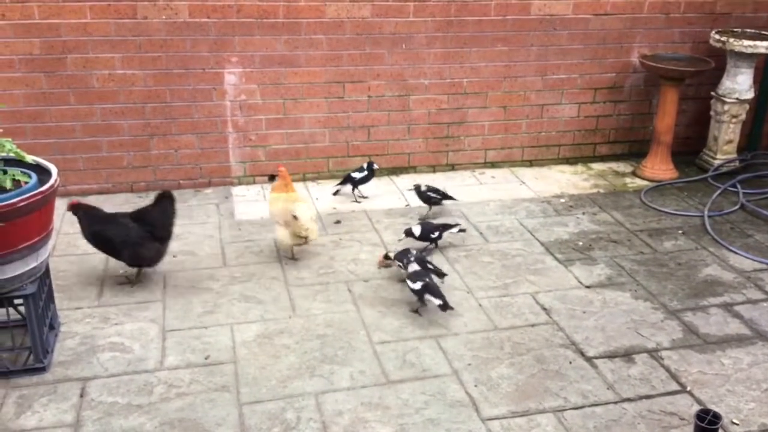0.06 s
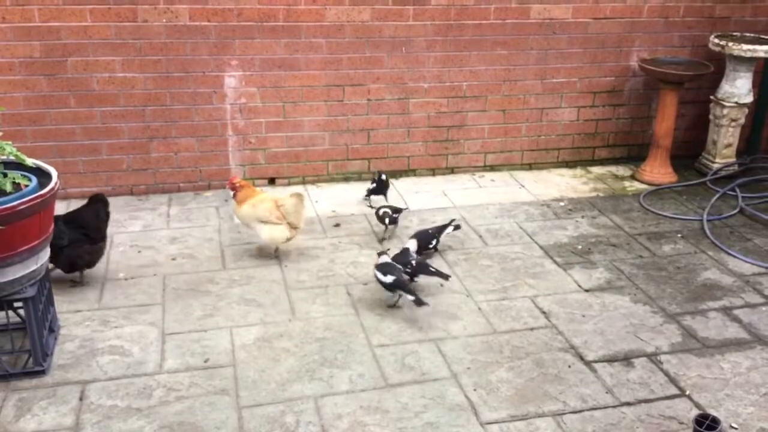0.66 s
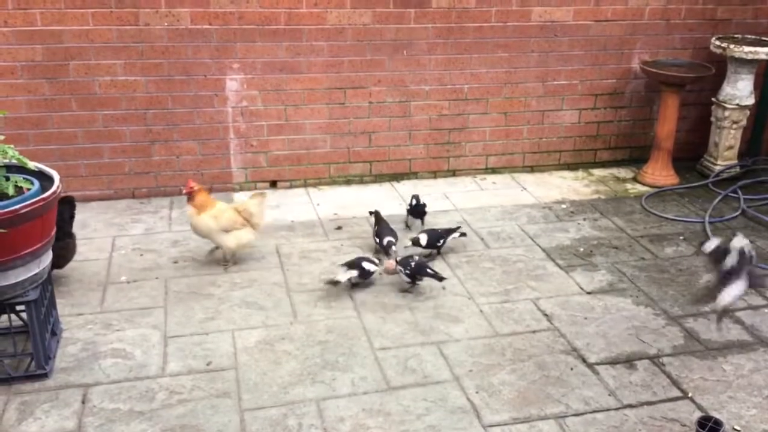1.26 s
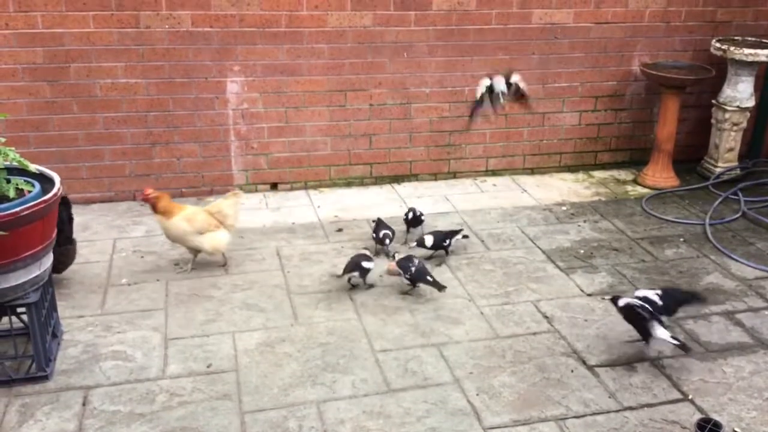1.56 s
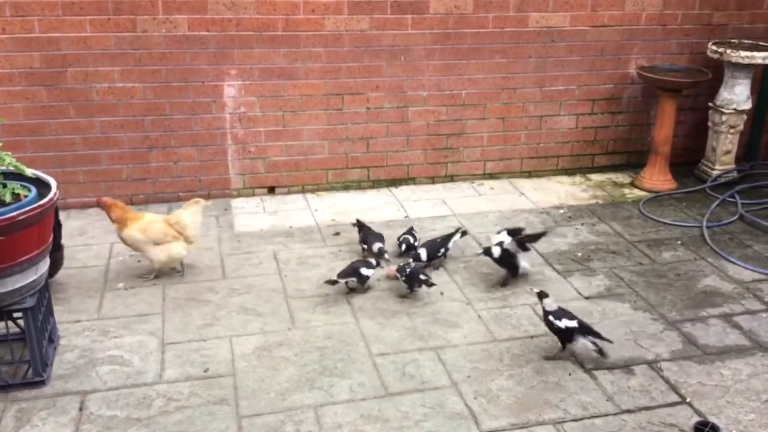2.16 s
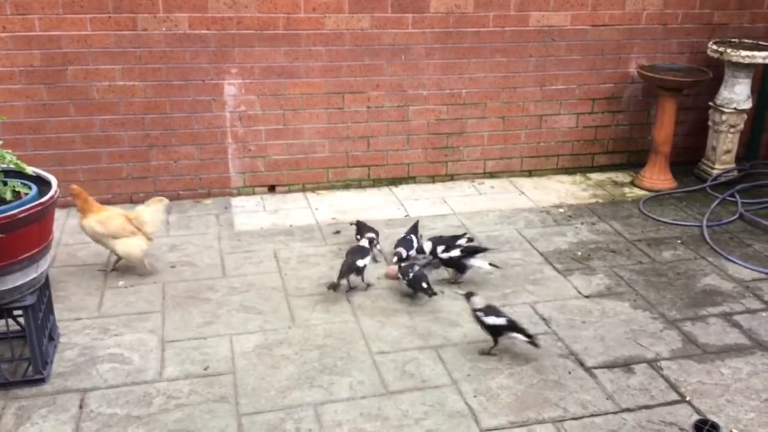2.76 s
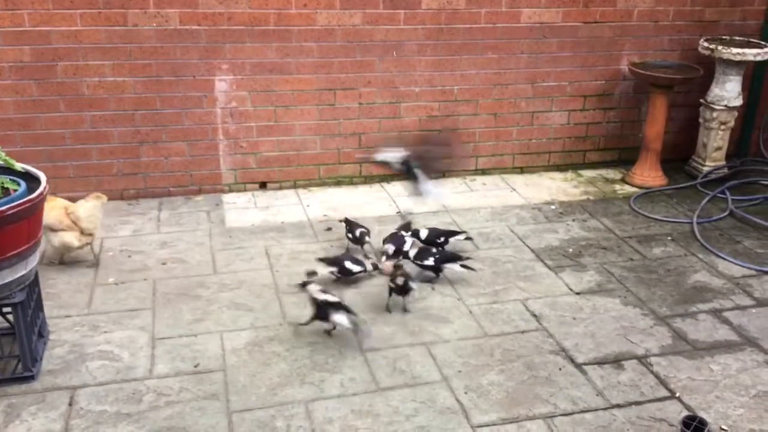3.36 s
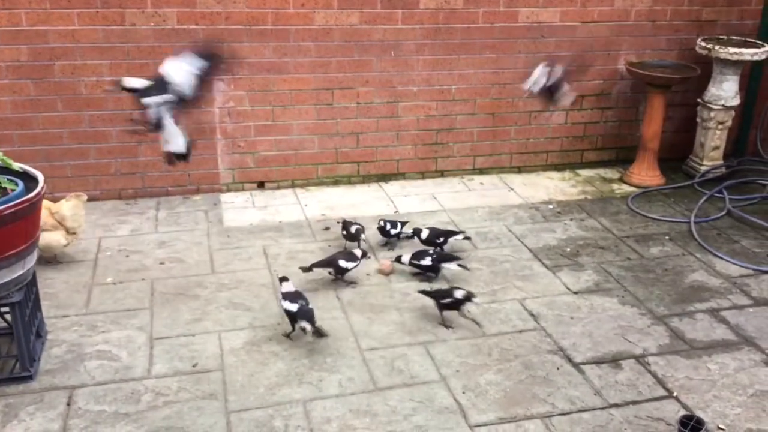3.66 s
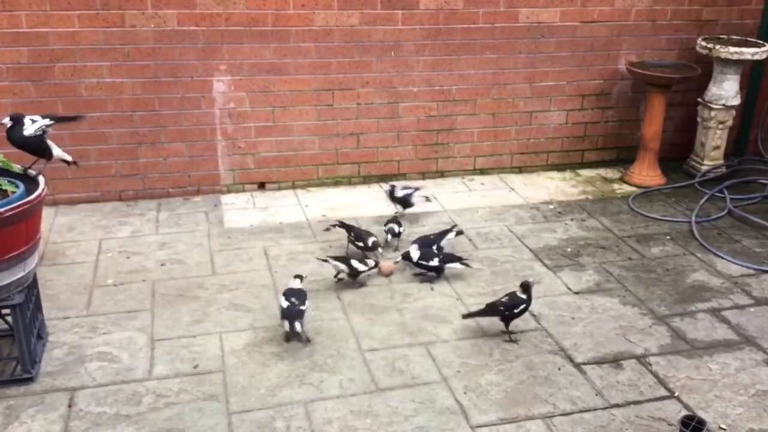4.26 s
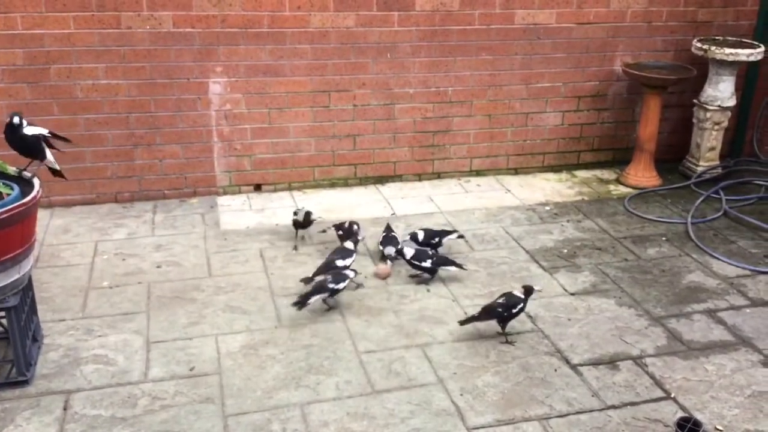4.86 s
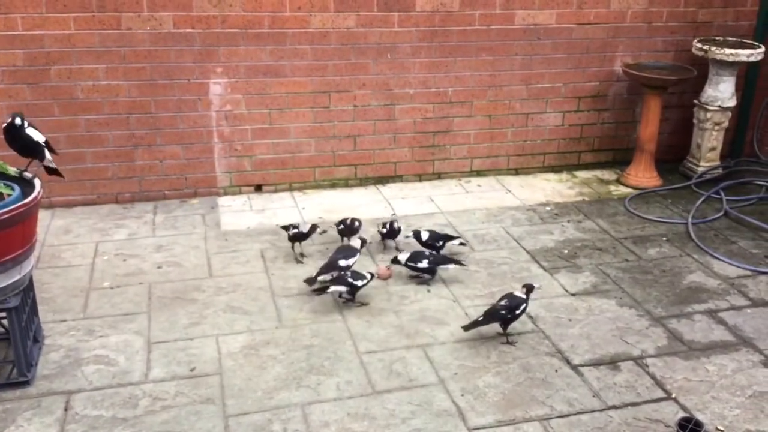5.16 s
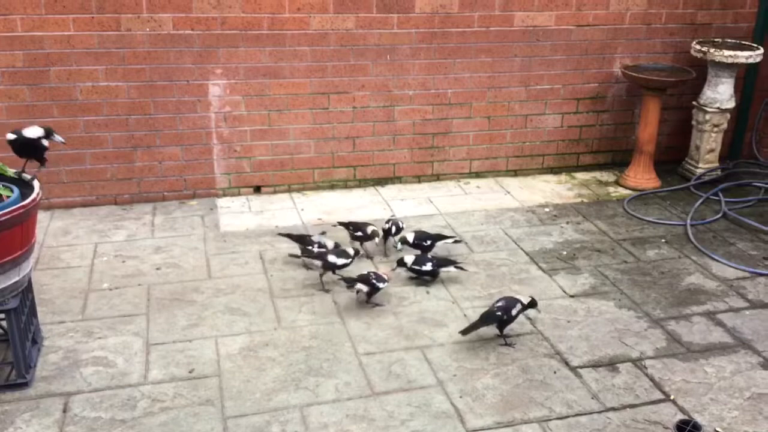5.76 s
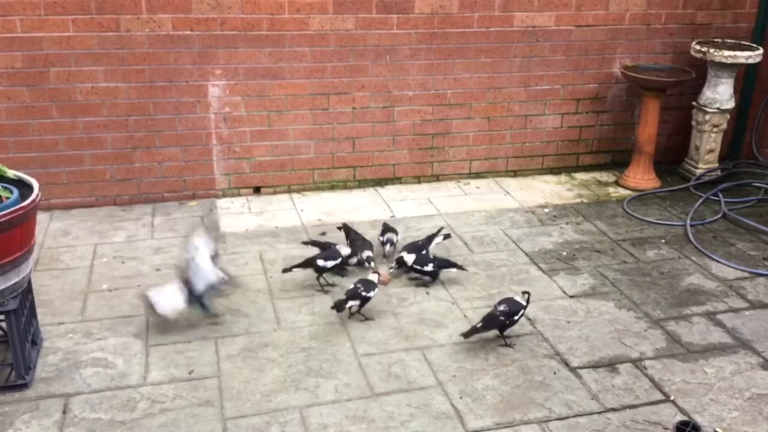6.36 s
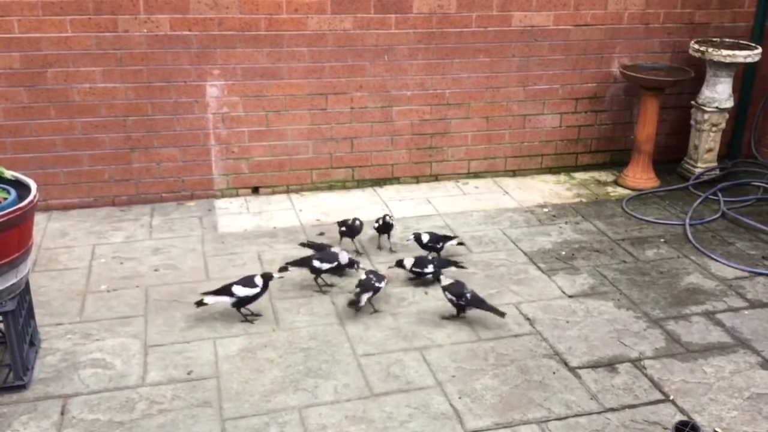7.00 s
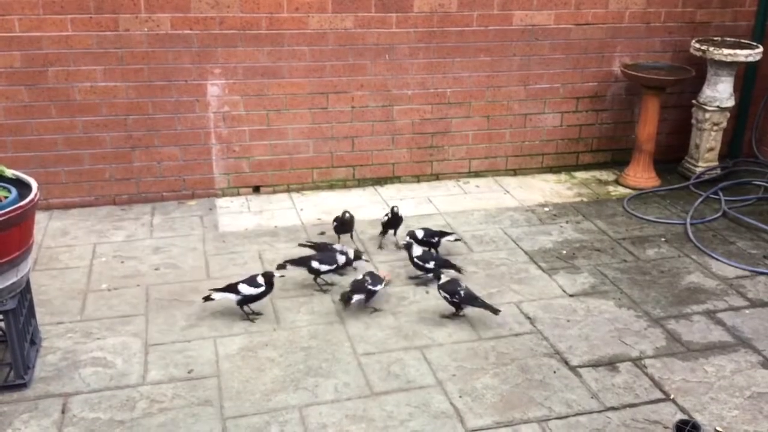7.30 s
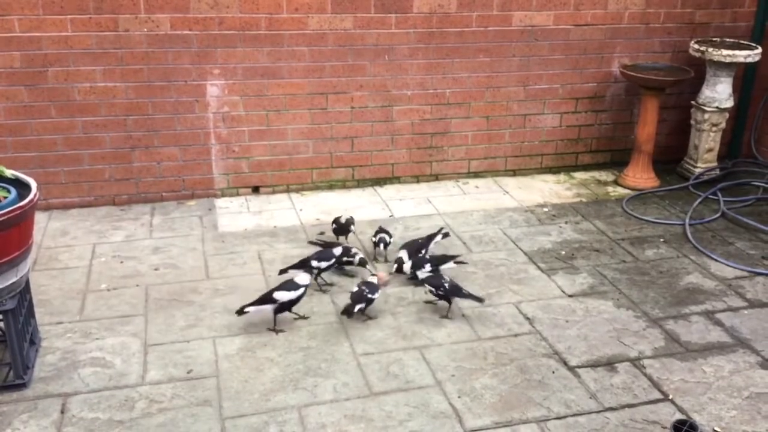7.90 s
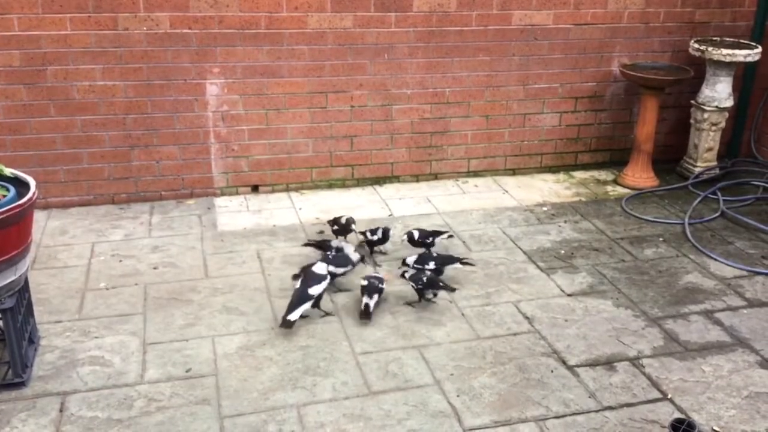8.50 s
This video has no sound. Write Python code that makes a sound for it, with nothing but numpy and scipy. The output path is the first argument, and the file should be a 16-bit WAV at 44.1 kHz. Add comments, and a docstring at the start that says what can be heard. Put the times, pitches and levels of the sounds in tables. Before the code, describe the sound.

Over a soft, steady outdoor rumble, a flock of magpies gives quick, raspy, arching squawks a short way from the microphone. One bird lets out a clear sliding squeal, and the squawking reaches its densest before easing into scattered calls. Feet and feathers shuffle faintly, beaks tick on paving, distant birds whistle, and wings swish once near the end. The walled yard gives everything a short echo.

```python
"""Magpies squawk over a low outdoor rumble, squabbling for food in a paved, brick-walled courtyard.
Each squawk is an arch of pitch, nasal or rasping: a membrane pulses, and throat and beak resonate.
Far birds whistle, feet and feathers shuffle, beaks and claws tick on the stone, one bird squeals,
and late on, wings flap once nearby. The walls return the calls, ticks and flap as a brief echo."""
import sys
import numpy as np
from scipy import signal
from scipy.fft import rfft, irfft, next_fast_len
from scipy.io import wavfile
from scipy.ndimage import uniform_filter1d

SR = 44100
rng = np.random.default_rng(int(sys.argv[2]) if len(sys.argv) > 2 else 0)


def materialize(psi):
    """Save the field psi as 16-bit PCM at rate SR to the path in sys.argv[1].

    A 1-D psi becomes a single channel; in a 2-D psi each row is a channel.
    """
    bounded = np.clip(np.atleast_2d(psi).T, -1, 1)
    quanta = np.round(bounded * 32767).astype(np.int16)
    wavfile.write(sys.argv[1], SR, quanta)


N = 376613
TIME = np.arange(N) / SR
CUTOFF_HZ = 15800


def from_db(db):
    """Decibels to amplitude ratio."""
    return 10 ** (np.asarray(db) / 20)


def unit_rms(x):
    """Normalisation to unit power."""
    return x / np.sqrt(np.mean(x ** 2) + 1e-20)


def in_time(rows, t):
    """Linear interpolation of each column at times t."""
    seconds, *columns = np.transpose(rows)
    return [np.interp(t, seconds, column) for column in columns]


def at_hz(points, hz):
    """Interpolation on a log-frequency axis."""
    frequencies, values = np.transpose(points)
    return np.interp(np.log(hz + 1e-9), np.log(frequencies), values)


def coloured(x, spectrum):
    """Zero-phase filtering by a spectral envelope, at unit rms."""
    size = next_fast_len(len(x))
    gain = from_db(at_hz(spectrum, np.fft.rfftfreq(size, 1 / SR)))
    return unit_rms(irfft(rfft(x, size) * gain, size)[:len(x)])


def tuned(shape, hz):
    """Frequency scaling of a resonance shape."""
    return [(multiple * hz, db) for multiple, db in shape]


def band(x, hz, kind, order=4):
    """Butterworth filtering."""
    return signal.sosfilt(signal.butter(order, hz, kind, fs=SR, output="sos"), x)


def wander(count, rate):
    """Random modulation of unit rms, with `rate` new values a second."""
    steps = np.arange(count) * rate / SR + rng.random()
    knots = int(steps[-1]) + 2
    return unit_rms(np.interp(steps, np.arange(knots), rng.standard_normal(N // 4)[:knots]))


def window(start, end, fade_s):
    """The times of a sound and its raised-cosine gate."""
    t = TIME[(TIME > start - fade_s / 2) & (TIME < end + fade_s / 2)]
    ramp = np.clip(np.minimum(t - start, end - t) / fade_s + .5, 0, 1)
    return t, np.sin(np.pi / 2 * ramp) ** 2


def add(out, t, sound):
    """Superposition of a sound at its times."""
    first = round(t[0] * SR)
    out[first:first + len(sound)] += sound


def arch(count, first, middle, last):
    """A parabolic glide through three pitches."""
    return np.polyval(np.polyfit([0, .5, 1], [first, middle, last], 2), np.linspace(0, 1, count))


def syrinx(pitch, rough, rasp_hz=135, swing=0.15, jitter=0.054, throb=0.16, waver=0.01245):
    """Modulation: flutter swings the membrane's phase and strength, and chaos scatters its cycles."""
    count = len(pitch)
    flutter = np.sin(2 * np.pi * np.cumsum(rasp_hz * (1 + .13 * wander(count, 70))) / SR)
    unsteady = waver * np.sqrt(abs(rough)) * wander(count, 91.5)
    breaking = abs(rough) ** 1.45 * (swing * flutter + jitter * wander(count, 900))
    phase = 2 * np.pi * np.cumsum(pitch * (1 + unsteady + breaking)) / SR
    strength = np.exp(rough * throb * (flutter + .5 * wander(count, 300.3)))
    return phase, strength


# The throat's main resonance. Each row: multiple of its frequency, gain in dB.
THROAT_FORMANT = [(.62,-11.5), (.8,2), (1,-7), (1.13,-4), (1.35,-10), (1.7,-32.5)]
def throat(x, hz, pitch, follows=.5, shift_ratio=1.132):
    """Formant tracking: the pitch blends a raised and a lowered resonance."""
    blend = np.clip(.5 + .5 * follows * np.log(pitch / pitch.mean()) / np.log(shift_ratio), 0, 1)
    raised = coloured(x, tuned(THROAT_FORMANT, hz * shift_ratio))
    lowered = coloured(x, tuned(THROAT_FORMANT, hz / shift_ratio))
    return blend * raised + (1 - blend) * lowered


# Peaks and dips of the open beak. Each row: multiple of its resonance, gain in dB.
BEAK_FORMANTS = [(.72,7), (0.869,0.5), (1,8.5), (1.19,-4.5), (1.471,-2), (1.77,-1), (2.1,1), (2.499,4.5)]
# The overall fall of the overtones. Each row: frequency in Hz, gain in dB.
OVERTONE_SLOPE = [(2700,5.5), (3200,-0.5), (3750,-3), (5000,-1.5), (8000,-3), (11000,-10), (15500,-29.5)]
def beak(x, hz, bright_db):
    """Cavity resonance colours the overtones; a treble shelf sets their brightness."""
    resonant = coloured(x, tuned(BEAK_FORMANTS, hz))
    sloped = coloured(resonant, OVERTONE_SLOPE)
    return coloured(sloped, [(5000, 0.0051), (9000, bright_db)])


def paving_bounce(x):
    """Comb filtering: a reflection off the paving, its delay set by where the bird stands."""
    lag = int(rng.uniform(.0005, .0016) * SR)
    return x + .35 * np.pad(x, (lag, 0))[:len(x)]


def effort(t, start, end, crest, fade_db, swell_db=12.5):
    """The envelope of one push of air, in dB relative to its crest."""
    along = (t - start) / (end - start)
    crest = np.clip(crest, .02, .98)
    rise = np.clip(1 - along / crest, 0, 1)
    fall = np.clip((along - crest) / (1 - crest), 0, 1)
    return -swell_db * rise ** 2.76 - fade_db * fall ** 1.12


def voiced(x, level_db, waver_db=2.56):
    """Amplitude modulation: one band is evened out, then wavers about the given level."""
    running_rms = np.sqrt(np.abs(uniform_filter1d(x * x, int(.028 * SR))) + 1e-12)
    return x / running_rms * from_db(level_db + waver_db * wander(len(x), 55.2))


# The band around the fundamental. Each row: multiple of the mean pitch, gain in dB.
LOW_BAND = [(.55,-6.5), (.78,9), (1.05,0.5), (1.35,8), (2,4.5)]
def squawk(start, end, first, middle, last, rough, rasp_hz, throat_hz, beak_hz, bright_db,
           level_db, crest, fade_db, low_db, high_db, low_hz=1280, high_hz=2850):
    """Source and filter: membrane pulses and air gated by each cycle sound through throat and beak."""
    t, gate = window(start, end, fade_s=.022)
    age = t - t[0]
    pitch = arch(len(t), first, middle, last)
    rough = rough * (1 + 1.3 * (1 - rough) * np.exp(-age / .04))   # the voice cracks, then settles
    phase, strength = syrinx(pitch, rough, rasp_hz)
    pulses = unit_rms(sum(np.cos(k * phase) for k in range(1, int(CUTOFF_HZ / pitch.mean()) + 2)))
    air = .45 * rough ** 2 * rng.standard_normal(N // 8)[:len(t)] * (1 + np.cos(phase))
    voice = strength * (pulses + air)
    low = coloured(band(voice, low_hz, "low", order=6), tuned(LOW_BAND, pitch.mean()))
    mid = throat(band(voice, [low_hz, high_hz], "band"), throat_hz, pitch)
    high = paving_bounce(beak(band(voice, high_hz, "high", order=6), beak_hz, bright_db))
    push_db = effort(t, start, end, crest, fade_db)
    shut_db = 7 * np.exp(-age / 0.0086)   # overtones are held back until the beak opens
    mid = voiced(mid, push_db)
    low = voiced(low, low_db + 0.49 * push_db)
    high = voiced(high, high_db + push_db - shut_db)
    return t, gate * from_db(level_db) * (mid + low + high)


# The squawks. Each row: start and end in seconds; first, middle and last pitch in Hz; roughness
# (0 is clear); rasp rate, throat resonance and beak resonance in Hz; brightness and relative crest
# level in dB; place of the crest from 0 to 1; fade after it in dB; low and high band in dB
# relative to the throat band.
MAGPIE_CALLS = [(0, 0.078, 874, 899, 864, 0.1, 72, 1750, 3570, -14, -48, 0, 34, -13, -1),
                (0.29, 0.368, 690, 714, 555, 1, 171.4, 2090, 5300, -21, -64.5, 0.57, 9, 4, -20),
                (0.78, 0.821, 586, 703, 940, 0.54, 133, 1377, 4970, -3, -68, 0.6, 5, 13.5, 2),
                (.816, 0.888, 1025, 928, 634, 0.36, 102.4, 1720, 5500, 0, -39, 0.2, 12.5, -5.5, -15.5),
                (0.956, 1.138, 1166, 985.6, 779, 0.99, 90.8, 1410, 5480, 3.5, -42.5, 0.63, 22, -3, -1),
                (1.394, 1.565, 735, 872, 759, .27, 74.3, 1740, 4380, -4.5, -45, 0.41, 23, 2, 1),
                (1.576, 1.627, 853, 1039, 930, 0.44, 79.6, 2110, 5370, 0.5, -45.5, 0.26, 30, 2.5, 5),
                (1.619, 1.786, 952, 831, 758, 0.74, 125.9, 1530, 4600, -3.5, -46.5, 0.5, 13.5, -5, -8),
                (1.82, 1.987, 569, 657, 567, 0.47, 145.7, 1660, 5700, -4, -53.5, .18, 4.5, 4.5, 0),
                (1.984, 2.117, 1000, 1000, 958, 0.71, 120.1, 1690, 3900, -4, -37.5, 0.76, 46, -1.5, -1.5),
                (2.131, 2.229, 456, 660, 789, 0.3, 68, 1960, 5100, -4.5, -40, 1, 13, -7, -7),
                (2.427, 2.664, 1078, 856.6, 738, 0.74, 161.3, 2030, 4880, -1, -33, 0.78, 6.5, -12, -10),
                (2.758, 2.848, 803, 615.4, 615, .7, 162, 1590, 4750, -3, -53, 0.4, -7.5, 2.5, -5.5),
                (2.85, 2.951, 865, 845, 688, 0.7, 93.5, 1780, 5800, 1.5, -37.5, 0.24, 14, -6, -9.5),
                (2.957, 3.148, 792, 933.4, 1061, 1.18, 71.7, 2220, 5130, 3.5, -34, 0.77, 25, -8, -5),
                (3.29, 3.451, 963, 1013, 1092, 0.9, 74.15, 1710, 4860, 6, -29.5, 0.7, 19, -13.5, -9),
                (3.448, 3.559, 1023, 1026, 1046, 0.51, 151.3, 2120, 5650, 4.5, -28, 0.96, 7, -15.5, -9.5),
                (3.551, 3.663, 920.5, 838.6, 671, 0.54, 107.7, 2000, 5740, 5, -26.5, 0.35, 22, -15.5, -11),
                (3.781, 3.854, 659, 730, 945, 0.77, 72.6, 1880, 5760, 14, -40, 1, 1, -6, -12),
                (3.834, 4.024, 1079, 1011, 876, .54, 149.2, 1900, 4930, 0.5, -26, 0.22, -1, -15.5, -10),
                (4.028, 4.167, 893, 820, 857, 0.68, 211.7, 2010, 4150, -5.5, -26.5, 0, 15, -13, -5),
                (4.637, 4.765, 747, 773, 659, .52, 76.9, 2180, 5850, -1.5, -41, 0.36, 15, -6, -16.5),
                (5.033, 5.18, 790, 960, 834, 0.37, 73, 1640, 5550, 2.5, -31.5, 0.2, 9, -13.5, -12.5),
                (5.262, 5.3, 604, 707, 744, 0.29, 74, 1430, 5260, 12, -38, 0.63, 2, -7, -22.5),
                (5.286, 5.34, 1163, 953, 684, 0.23, 221, 1900, 5190, 7, -33.5, 0.21, 21, -7, -19),
                (5.534, 5.658, 770, 928.6, 763, .25, 77.2, 2140, 4780, -10.5, -42.5, 0.51, 16, -3.5, -14.5),
                (5.929, 6.074, 780.6, 931, 581, 0.56, 103.1, 1640, 4500, -6, -46, 0.36, 8.5, -3.5, 0.5),
                (6.482, 6.628, 637, 986, 926, 0.44, 92.9, 1900, 5800, 1.5, -36.5, 0.8, 6, -6.5, -3.5),
                (7.213, 7.354, 609, 937, 759, 0.61, 149, 1530, 4360, -10.5, -42, 0.62, 11, -3.5, -5.5),
                (7.671, 7.871, 606, 630, 600, 1.15, 172.7, 1400, 4470, 0, -49, 0.47, 5.5, 2, -15.5),
                (7.971, 8.089, 647, 706.4, 596, 0.29, 77, 1610, 5250, 0, -36.5, 0.29, 15.5, -6.5, -19.5),
                (8.237, 8.326, 499, 526, 836, 0.64, 80.4, 1480, 5000, 5, -64, 1, -2, 13.5, -9),
                (8.326, 8.429, 765, 768.6, 694, 0.43, 120.2, 1660, 5670, 1.5, -33.5, 0.39, 9, -8.5, -10),
                (8.421, 8.529, 886, 915, 794, 0.84, 71.8, 1850, 4670, -4, -35, 0.76, 11, -6, -6.5)]
def flock():
    """Superposition of the feeding birds' squawks."""
    out = np.zeros(N)
    for call in MAGPIE_CALLS:
        add(out, *squawk(*call))
    return out


# The outdoor background. Each row: frequency in Hz, relative spectral density in dB.
RUMBLE_SPECTRUM = [(22,-37), (32,-27), (46,1.5), (160,-1.5), (380,-14), (700,-22.5), (1500,-26),
                   (3300,-44.5), (4700,-49), (9000,-49), (15600,-56)]
def rumble(level_db=-55):
    """Stationary noise with most of its power in the bass."""
    return from_db(level_db) * coloured(rng.standard_normal(N), RUMBLE_SPECTRUM)


# Distant whistles and chirps. Each row: start and end in seconds; first, middle and last pitch
# in Hz; level in dB; roughness from 0 to 1.
WHISTLES = [(0.117,0.215,610,532,480,-70,0.4), (4.44,4.58,1170,1180,1234,-71.5,0.12),
            (5.331,5.424,3140,3128,3180,-59.5,0.3), (5.658,5.761,3355,3107,3250,-50.5,0.29),
            (5.745,5.86,3270,3220,3110,-72,0.06), (5.886,5.96,2920,2594,2510,-50,0.3),
            (6.086,6.23,2426,2315,2157,-59.5,0.77), (6.797,7.018,1240,1209,1284,-62,0.22),
            (6.999,7.22,1260,1405,1594,-60.5,0), (7.811,7.988,1400,1379,1330,-62,0.2)]
def far_birds():
    """Attenuation with distance: only the fundamental of each call carries."""
    out = np.zeros(N)
    for start, end, first, middle, last, level_db, rough in WHISTLES:
        t, gate = window(start, end, fade_s=0.077)
        phase, strength = syrinx(arch(len(t), first, middle, last), rough)
        add(out, t, gate * from_db(level_db) * unit_rms(strength * np.sin(phase)))
    return out


# Flurries as birds land and jostle. Each row: time of the peak in seconds, level in dB.
JOSTLES = [(1.45, -64), (3.65, -60.5), (6.2, -70.5), (7.5, -78.5)]
# Feet and feathers. Each row: frequency in Hz, relative spectral density in dB.
SHUFFLE_SPECTRUM = [(800,-16), (2500,-8), (6000,-16.5), (10000,-14), (15500,-10.5)]
def shuffle(patchy_db=3.5, rise_db_per_s=19.5, fall_db_per_s=27.5):
    """Uneven friction noise of feet and feathers grows and decays exponentially with each flurry."""
    patchy = rng.standard_normal(N) * from_db(patchy_db * wander(N, 78))
    bustle = sum(from_db(db - np.maximum(rise_db_per_s * (peak - TIME), fall_db_per_s * (TIME - peak)))
                 for peak, db in JOSTLES)
    return bustle * coloured(patchy, SHUFFLE_SPECTRUM)


# Beaks and claws striking stone. Each row: start in seconds, relative peak level in dB.
STRIKES = [(1.904,-53), (3.749,-51), (4.333,-71), (4.86,-55.5), (5.287,-57), (5.483,-53), (5.886,-66),
           (6.21,-55), (6.808,-46), (6.943,-51), (7.049,-52.5), (7.463,-49), (7.586,-52), (7.947,-59)]
# The hard beak's modes. Each row: frequency in Hz, level in dB, time to decay 60 dB in seconds.
BEAK_MODES = [(2900,-10,0.0054), (5370,-20.5,0.0027), (7500,-35.5,0.0021), (9500,-13.5,0.00075),
              (13000,-6.5,.002)]
def pecks(gain_db=-2, contact_s=0.00089, faint_count=40, faint_db=-66, spread_db=4):
    """Impact excitation: gritty contacts ring the beak's modes; fainter ones fall at random."""
    out = np.zeros(N)
    faint_starts = rng.uniform(0, TIME[-1] - .05, faint_count)
    faint_levels = rng.normal(faint_db, spread_db, faint_count)
    age = TIME[:SR // 25]
    ring = sum(from_db(db - 60 * age / t60) * np.sin(2 * np.pi * hz * age) for hz, db, t60 in BEAK_MODES)
    for start, peak_db in [*STRIKES, *zip(faint_starts, faint_levels)]:
        grit = rng.standard_normal(len(age)) * np.exp(-age / contact_s)
        tick = signal.fftconvolve(grit, ring)[:len(age)]
        add(out, start + age, from_db(peak_db + gain_db) * tick / np.abs(tick).max())
    return out


# A thin falling squeal. Each row: time in seconds, pitch in Hz, level in dB.
SQUEAL_GLIDE = [(2.236,2260,-28), (2.247,2190,-29), (2.281,2113,-24.5), (2.322,2010,-28.5),
                (2.333,2007,-36.5), (2.367,1883,-31), (2.385,1750,-60)]
# Its harmonics. Each row: multiple of the pitch, relative level in dB.
SQUEAL_HARMONICS = [(1,5), (2,-10), (3,-16), (4,-23), (5,-35), (6,-44)]
def squeal(rough=0.13, mellowing=0.43):
    """Nearly sinusoidal vibration: the note slides down and loses its overtones as it fades."""
    out = np.zeros(N)
    t, gate = window(SQUEAL_GLIDE[0][0], SQUEAL_GLIDE[-1][0], fade_s=.012)
    pitch, level_db = in_time(SQUEAL_GLIDE, t)
    phase, strength = syrinx(pitch, rough)
    fading_db = mellowing * (level_db - level_db.max())
    note = sum(from_db(db + fading_db * (k > 1)) * np.sin(k * phase) for k, db in SQUEAL_HARMONICS)
    add(out, t, gate * from_db(level_db) * unit_rms(strength * note))
    return out


# One wing stroke. Each row: time in seconds, relative levels of swish and pushed air in dB.
WING_STROKE = [(6.64, -56, -44), (6.661, -35, -53), (6.683, -45.5, -48), (6.812, -82, -45),
               (6.834, -88, -71), (6.86, -69, -53)]
# Its swish and its pushed air. Each row: frequency in Hz, relative spectral density in dB.
SWISH_SPECTRUM = [(180, -22.5), (300, 2.5), (500, -18.5), (769, -8), (1390, -15.5), (2880, -15.5),
                  (3280, -27.5), (7880, -20.5), (15500, -25.5)]
PUFF_SPECTRUM = [(18, -32), (30, -1), (113, 6), (279, -6), (313, -20), (485, -13), (600, -14), (780, -30),
                 (1320, -120)]
def wings(swish_gain_db=-1, air_gain_db=-2):
    """Aerodynamic noise: feathers swish, and the air that they push makes a soft rumble."""
    out = np.zeros(N)
    t, gate = window(WING_STROKE[0][0], WING_STROKE[-1][0], fade_s=0.0031)
    swish_db, air_db = in_time(WING_STROKE, t)
    swish = coloured(rng.standard_normal(N)[:len(t)], SWISH_SPECTRUM)
    swish *= from_db(swish_db + swish_gain_db + 2 * wander(len(t), 188))
    puff = coloured(rng.standard_normal(N)[:len(t)], PUFF_SPECTRUM) * from_db(air_db + air_gain_db)
    add(out, t, gate * (swish + puff))
    return out


# Slaps off the brick walls. Each row: delay in seconds, gain in dB.
EARLY_REFLECTIONS = [(0.0109,-7.5), (.027,-18.5), (0.047,-19)]
# The yard's reverberation. Each row: frequency in Hz, time to decay 60 dB in seconds.
DECAY_TIMES = [(300,0.61), (1000,0.45), (2000,0.45), (5000,0.35), (14000,0.31)]
def courtyard(x, tail_db=-5.0, build_s=0.0021):
    """Reverberation: a few wall reflections and a diffuse tail whose treble dies first."""
    age = TIME[:SR * 3 // 4]
    octave_edges = np.geomspace(125, 16000, 8)
    tail = 0
    for low, high in zip(octave_edges, octave_edges[1:]):
        noise = band(rng.standard_normal(len(age)), [low, high], "band", order=2)
        tail += noise * from_db(-60 * age / at_hz(DECAY_TIMES, np.sqrt(low * high)))
    tail *= 1 - np.exp(-age / build_s)
    response = from_db(tail_db) * tail / np.sqrt(np.sum(tail ** 2))
    for delay, db in EARLY_REFLECTIONS:
        response[round(delay * SR)] += from_db(db)
    return signal.fftconvolve(x, response)[:N]


def scene():
    """Direct and reflected sound of birds near and far add to the background."""
    near = from_db(-3.48) * flock() + pecks() + wings()
    note, far = squeal(), far_birds()
    reflected = courtyard(near + from_db(-6) * note + far)
    return (near + note + far + reflected + rumble() + shuffle())[None]


def record(dry):
    """Band limiting: the microphone sheds the deepest bass, and the top is cut steeply."""
    sound = band(dry, 33, "high", order=3)
    return signal.sosfilt(signal.ellip(12, .1, 80, CUTOFF_HZ, fs=SR, output="sos"), sound)


dry = scene()
out = record(dry)
materialize(out)
```